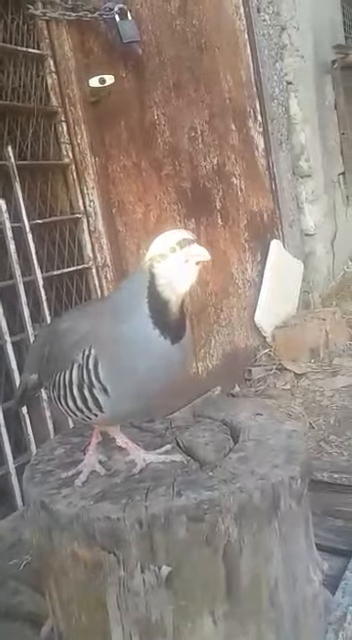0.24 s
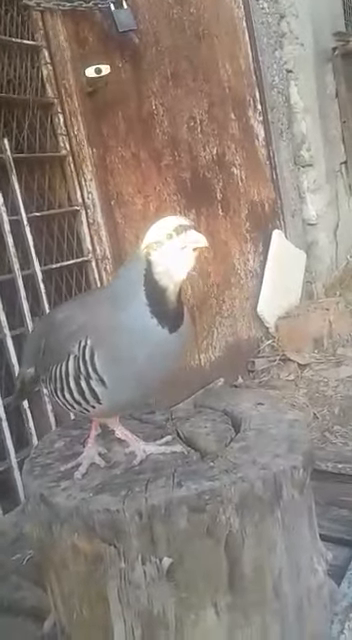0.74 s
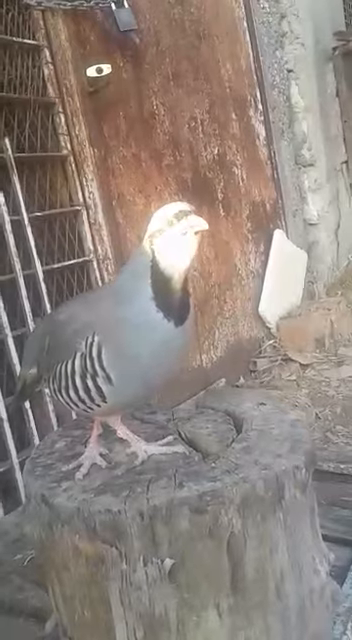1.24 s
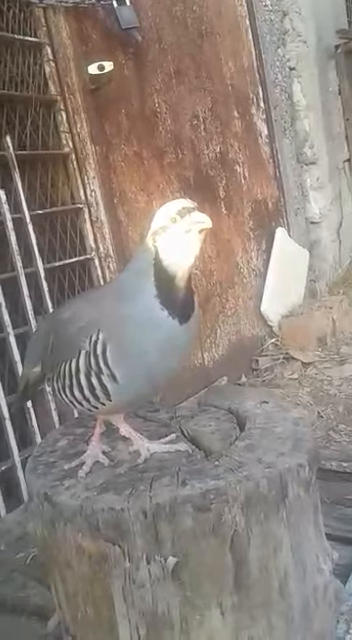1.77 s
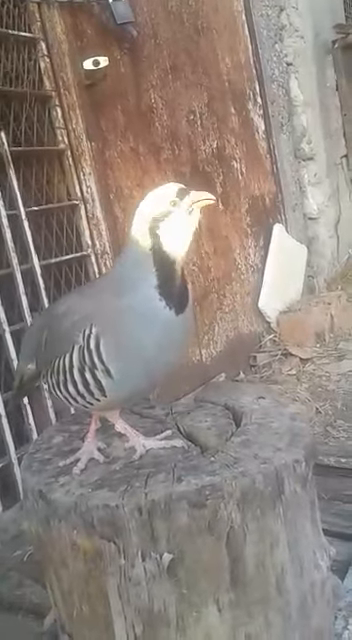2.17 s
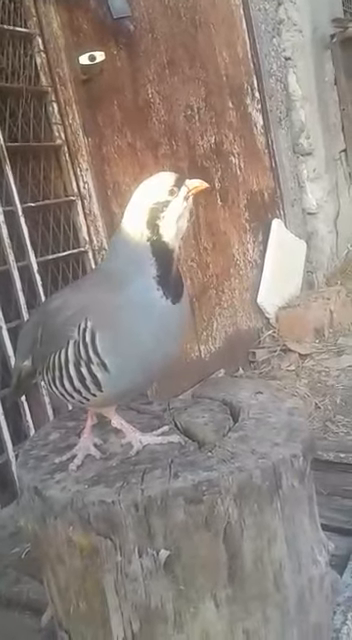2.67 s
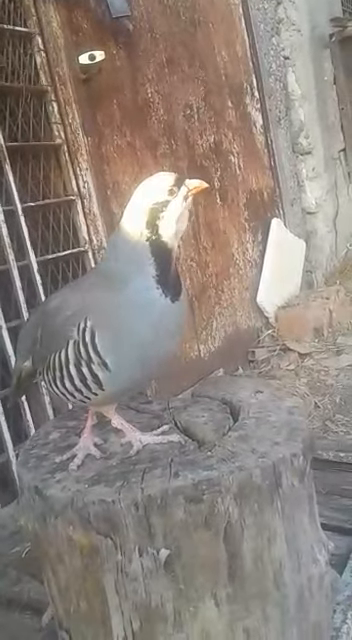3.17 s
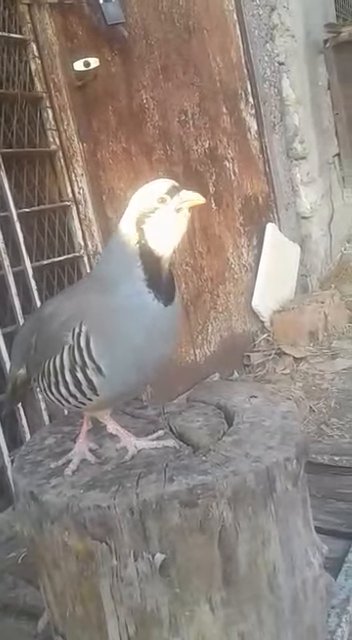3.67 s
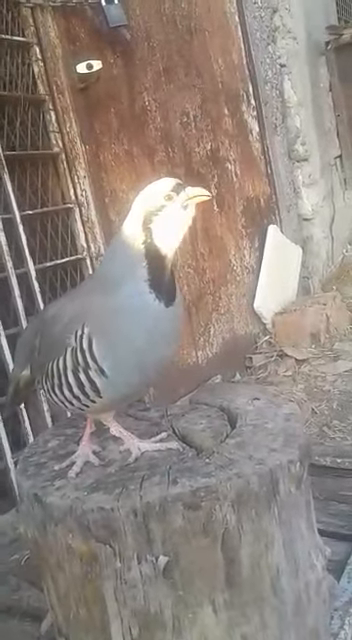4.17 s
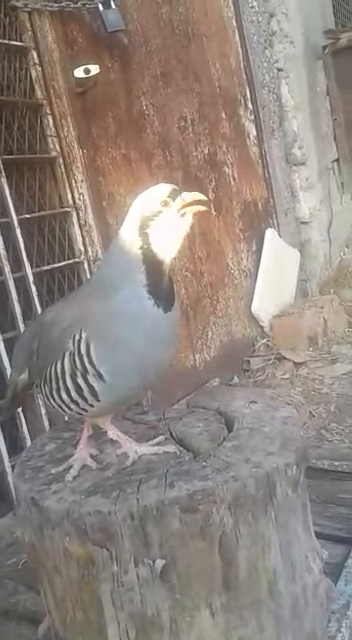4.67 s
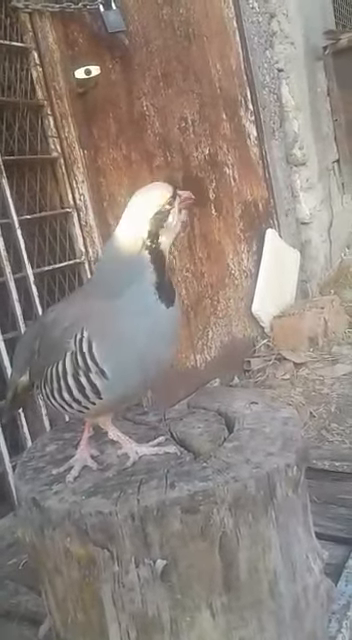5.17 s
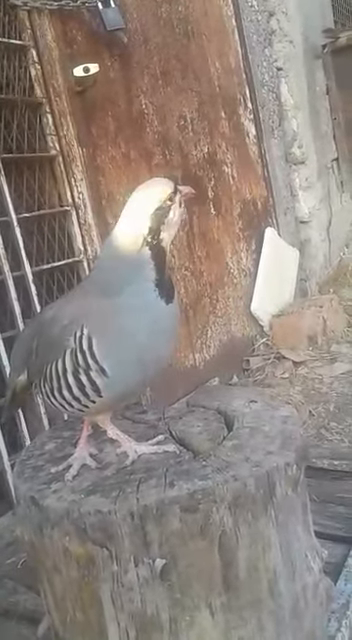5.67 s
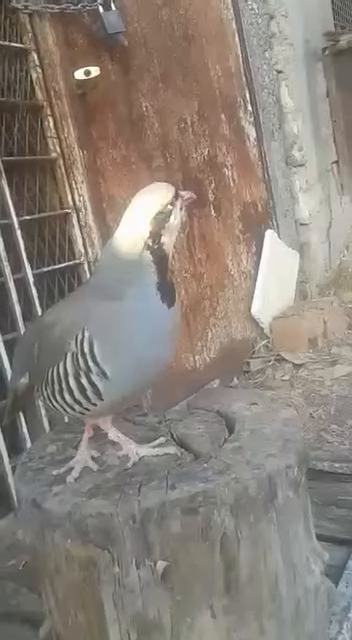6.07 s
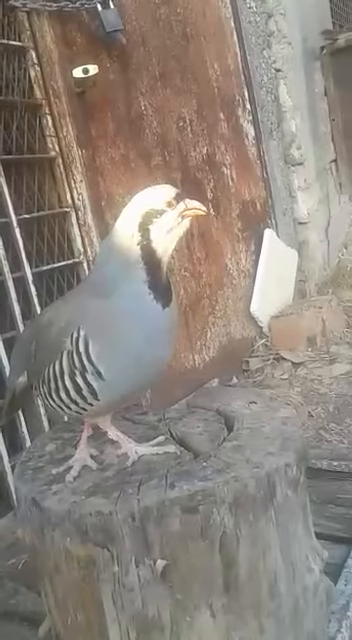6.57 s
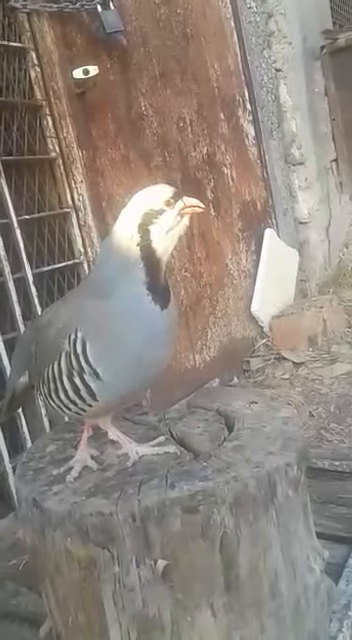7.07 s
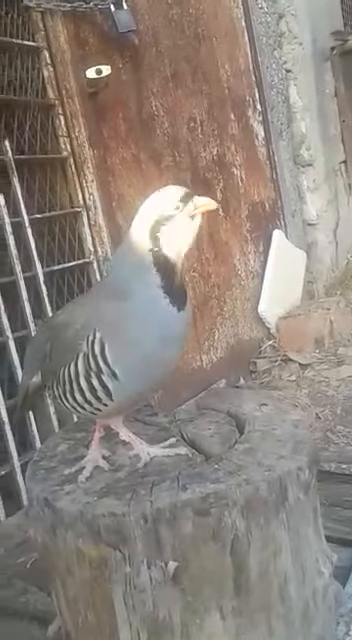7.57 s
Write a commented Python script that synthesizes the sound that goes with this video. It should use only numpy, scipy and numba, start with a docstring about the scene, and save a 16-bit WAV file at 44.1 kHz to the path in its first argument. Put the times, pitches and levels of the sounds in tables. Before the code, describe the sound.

A partridge calls close to the microphone in a small walled yard, over a steady low outdoor rumble. It opens with a soft cluck and a warbling cackle, then from about 0.6 seconds repeats quick phrases of harsh bark, cluck and cackle. Between 2.1 and 2.6 seconds it breaks into four loud, clear chucks, then returns to the phrases. Two more chucks come around 4.7 seconds and four between 6.6 and 7.2 seconds, followed by a last bark, cluck and cackle ending near 7.7 seconds. A second partridge gives faint, hoarse notes further off until about 3.8 seconds. A small distant bird chirps thinly now and then, mostly after 5.5 seconds. Feathers rustle softly at 3.4 seconds, and one dry tick sounds right at the microphone at 7 seconds. The walls ring briefly after each note.

```python
"""A small walled yard, a low outdoor rumble; a chukar partridge on a stump, close to the microphone.
It opens with a soft cluck while a small bird and a second partridge call faintly further off.
A warbling cackle follows, then phrases of harsh bark, cluck and cackle, all pulses of the syrinx
ringing in throat and beak. From 2 s on it breaks three times into loud, clear chucks. Feathers rustle
at 3.4 s, and one dry tick comes at 7 s. The walls ring briefly after each note."""
import sys
import numpy as np
from scipy import signal
from scipy.fft import rfft, irfft
from scipy.io import wavfile
from scipy.ndimage import uniform_filter1d
from numba import njit

SR = 44100
rng = np.random.default_rng(int(sys.argv[2]) if len(sys.argv) > 2 else 0)


def generate_wav(sig):
    """Save sig (samples, or channels by samples) to the path in sys.argv[1] as 16-bit PCM at SR."""
    pcm = np.round(np.clip(np.atleast_2d(sig).T, -1, 1) * 32767).astype(np.int16)
    wavfile.write(sys.argv[1], SR, pcm)


N = 345303


def from_db(db):
    """Decibels to gain."""
    return 10 ** (np.asarray(db) / 20)


def add(out, start_s, sound):
    """Mix a sound in at its time."""
    at = max(int(start_s * SR), 0)
    out[at:at + len(sound)] += sound[:max(len(out) - at, 0)]


def noise(*shape):
    """White noise for one note, up to a quarter second long."""
    return rng.standard_normal((*shape[:-1], SR // 4))[..., :shape[-1]]


def smooth(x, seconds):
    """Moving average."""
    return uniform_filter1d(x, max(int(seconds * SR), 1))


def even(x):
    """Hold the rms at 1 over a few voice cycles."""
    return x / np.sqrt(np.abs(smooth(smooth(x * x, .007), .007)) + 1e-12)


def response(points, size=1024):
    """Causal (minimum-phase) impulse response for points (frequency [Hz], level [dB])."""
    hz, db = np.transpose(points)
    grid = np.maximum(np.arange(size // 2 + 1) * SR / size, 1)
    gain = from_db(np.interp(np.log(grid), np.log(hz), db))
    cepstrum = irfft(np.log(gain))
    cepstrum[1:size // 2] *= 2
    cepstrum[size // 2 + 1:] = 0
    return irfft(np.exp(rfft(cepstrum)))


def through(x, impulse):
    """Filter by an impulse response."""
    return signal.fftconvolve(x, impulse)[:len(x)]


@njit
def moving_resonance(x, centre, width):
    """One resonance whose centre glides; centre and width in cycles per sample."""
    out, state = np.zeros(len(x)), 0j
    for i in range(len(x)):
        state = state * np.exp(-np.pi * width + 2j * np.pi * centre[i]) + x[i]
        out[i] = state.real
    return out


def air(level_db=-47):
    """Steady outdoor rumble and hush all round the microphone."""
    # colour of the background: (frequency [Hz], relative level [dB])
    spectrum = [(25, -23), (45, -7), (65, 0.5), (88, 0.5), (112, -2), (160, -4), (230, -7.5), (500, -9.5),
                (1700, -8), (2150, -24.5), (3500, -34), (4300, -33), (5000, -35.5), (7300, -48),
                (8400, -60.5), (12000, -45.5), (16000, -40.5)]
    rumble = through(rng.standard_normal(N + SR), response(spectrum, size=8192))[SR:]
    return from_db(level_db) * rumble / rumble.std()


def hum(hz=89, width_hz=10, level_db=-63.5):
    """A faint wavering drone in the distance: noise in one narrow resonance."""
    drone = moving_resonance(rng.standard_normal(N + SR), np.full(N + SR, hz / SR), width_hz / SR)[SR:]
    lowpass = signal.butter(2, 200, fs=SR, output="sos")
    return from_db(level_db) * signal.sosfilt(lowpass, drone / drone.std())


def syrinx(pitch, rough, hiss=0.038, stumble=0.16, shimmer_db=3.5, doubling_db=-1.5):
    """One pulse a cycle; with roughness the pulses stumble, alternate strong and weak, and carry hiss."""
    cycles = np.cumsum(pitch) / SR
    turn, samples = np.arange(int(cycles[-1]) + 1), np.arange(len(pitch))
    unrest = np.interp(turn, cycles, rough)
    slip, size = noise(2, len(turn))
    when = np.interp(turn + stumble * unrest ** 2 * slip, cycles, samples)   # steady until it breaks
    strength = from_db(unrest * (shimmer_db * size + doubling_db * (-1) ** turn))
    pulses = strength @ np.sinc(np.clip(samples - when[:, None], -8, 8))
    breath = hiss * rough * (1 + np.cos(2 * np.pi * cycles)) * noise(len(pitch))
    return pulses + breath


def voice(pitch, level_db, throat_hz, rough, beak, bright_db, width_hz, chest_db):
    """Pulses ring in chest, throat and beak; an opening beak raises the throat resonance and treble."""
    # the throat's steady colour, under its moving resonance: (frequency [Hz], level [dB])
    throat = [(150, -22), (260, 8), (350, 6), (470, 1), (600, -6), (780, 1.5), (1000, -1), (1330, -1),
              (1580, -10), (2000, -13), (2800, -24), (5000, -44)]
    chest_hz, body_db, beak_db, beak_db_per_octave = 380, 0.25, -25.5, 10.5
    source = syrinx(pitch, np.clip(rough, 0, 1))
    body = through(source, response(throat))
    for _ in range(2):   # two passes give the resonance steep flanks
        body = moving_resonance(body, throat_hz / SR, width_hz / SR)
    chest = signal.lfilter(*signal.iirpeak(chest_hz, 2, fs=SR), body)
    body = body + (from_db(chest_db) - 1) * chest
    edge = through(source, response(beak))
    edge_db = beak_db + bright_db + beak_db_per_octave * np.log2(throat_hz / 1000)
    edge_db += 0.42 * (level_db - np.median(level_db))   # weak moments of a note are duller
    return from_db(level_db) * (from_db(body_db) * even(body) + from_db(edge_db) * even(edge))


def course(rows, glide_s=0.0037, catch_s=0.0032, release_s=0.0025):
    """Rows (time [s], pitch [Hz], level [dB], ...) as smooth controls; the voice catches and lets go."""
    times, pitch, db, *others = np.transpose(rows)
    times = np.sort(times)
    t = np.arange(times[0], times[-1] + .002, 1 / SR)
    columns = (pitch, from_db(db) ** 2, *others)
    pitch, power, *others = [smooth(np.interp(t, times, column), glide_s) for column in columns]
    catch = (1 + np.tanh(2 * (t - times[0] - catch_s) / catch_s)) / 2
    gate = catch * np.tanh((t[-1] - t) / release_s)
    return pitch, 10 * np.log10(np.abs(power) * gate ** 2 + 1e-14), *others


def chatter(times, pitch, db, throat_hz, break_hz=410, break_span_hz=220):
    """The low voice of clucks and cackles; it turns rough on high crests and in fast swings."""
    # resonances of the half-open beak: (frequency [Hz], level [dB])
    half_open_beak = [(1500, -13), (1950, -1), (2400, 2), (2700, -13.5), (3100, -17), (3580, 1),
                      (3850, -5.5), (4200, -0.5), (4550, 4), (4800, -4.5), (5100, -19), (5600, -31),
                      (6450, -28.5), (6900, -22), (7450, -32), (8200, -47.5), (9800, -44), (11500, -29.5),
                      (15500, -33)]
    pitch, db, throat_hz = course(np.column_stack([times, pitch, db, throat_hz]))
    octaves_per_s = smooth(np.abs(np.gradient(np.log2(pitch))) * SR, .02)
    rough = 0.2 + np.maximum(pitch - break_hz, 0) / break_span_hz + 0.0067 * octaves_per_s
    return voice(pitch, db, throat_hz, rough, half_open_beak, bright_db=3.0, width_hz=500, chest_db=4.0)


def clucks(attack_s=0.0089, attack_db=12, fade_db=13):
    """The near bird's soft clucks: one quick bend of pitch, loudest just after it starts."""
    # (time [s], length [s], first, middle and last pitch [Hz], level [dB], throat resonance [Hz])
    notes = [(0.066, 0.038, 407, 402, 390, -16.5, 886), (0.417, .046, 264.3, 311, 242, -20, 910),
             (0.724, 0.0419, 321, 306, 246, -23.5, 820), (1.255, 0.045, 308, 349, 246, -23.5, 880),
             (1.778, 0.041, 420, 351.6, 239, -18, 870), (2.865, 0.038, 329, 316, 239, -24.5, 840),
             (3.409, 0.04, 386, 333, 446, -22, 860), (3.954, 0.038, 438, 550.5, 378, -17.5, 940),
             (4.358, 0.057, 485, 485, 250, -12, 1150), (4.468, 0.03, 304, 343, 263.2, -15.5, 1100),
             (5.096, 0.0489, 325, 345, 250, -24, 850), (5.655, 0.038, 464, 425, 387, -19, 860),
             (6.198, 0.036, 427, 523, 364, -17.5, 900), (7.434, 0.047, 342, 318, 245, -26.5, 818)]
    out = np.zeros(N)
    for start, length, first_hz, middle_hz, last_hz, db, throat_hz in notes:
        u = np.linspace(0, 1, int(length * SR))
        outer_hz = np.where(u < .5, first_hz, last_hz)
        pitch = middle_hz + (outer_hz - middle_hz) * np.cos(np.pi * u) ** 2
        level_db = db - attack_db * np.maximum(1 - u * length / attack_s, 0) - fade_db * u ** 3.2
        add(out, start, chatter(start + u * length, pitch, level_db, np.full(len(u), throat_hz)))
    return out


def small_bird(octave_db=-21, waver_hz=70):
    """Far off, gliding, slightly wavering whistles with a weak octave."""
    # thin chirps and fainter, higher twitters: (time [s], length [s], first, last pitch [Hz], level [dB])
    chirps = [(5.66, 0.089, 2370, 2770, -49), (6.116, 0.096, 2714, 2873, -49.5),
              (6.215, 0.061, 2879, 2590, -57), (6.76, 0.04, 1850, 2168, -43),
              (7.34, 0.044, 2580, 2410, -41), (7.768, 0.034, 2218, 1980, -44.5)]
    twitters = [(0.128, .07, 5260, 5900, -70.5), (1.52, .07, 5500, 6100, -67),
                (3.718, 0.068, 5670, 6130, -60), (5.67, 0.068, 4900, 5600, -74),
                (6.127, 0.062, 5330, 5685, -68), (6.498, 0.13, 4200, 4310, -57)]
    out = np.zeros(N)
    for start, length, first_hz, last_hz, db in chirps + twitters:
        waver = smooth(noise(int(length * SR)), .002)
        pitch = np.linspace(first_hz, last_hz, len(waver)) + waver_hz * waver / waver.std()
        phase = 2 * np.pi * np.cumsum(pitch) / SR
        whistle = np.sin(phase) + from_db(octave_db) * np.sin(2 * phase)
        add(out, start, from_db(db) * np.hanning(len(phase)) * whistle)
    return out


def far_partridge(gain_db=-7.5, width_hz=340, rough=0.72, fall=.16):
    """Hoarse falling notes whose third harmonic sits on the throat resonance, dulled by distance."""
    # the second bird's calls: (time [s], length [s], level [dB], throat resonance [Hz])
    calls = [(0.148, 0.063, -30.5, 1510), (0.396, 0.071, -27, 1650), (.98, 0.029, -22, 1660),
             (1.295, 0.046, -28.5, 1680), (1.515, 0.044, -24.5, 1677), (1.553, 0.044, -25.5, 1544),
             (1.706, 0.036, -35.5, 1920), (2.094, 0.0326, -23.5, 1784), (2.469, 0.038, -39.5, 1716),
             (2.682, 0.019, -29.5, 1805), (2.71, 0.042, -26.5, 1797), (3.401, 0.045, -30, 1708),
             (3.452, 0.055, -26, 1323), (3.605, 0.054, -36, 1810), (3.727, .03, -26, 1205),
             (3.755, 0.042, -32.5, 1470)]
    out = np.zeros(N)
    band = signal.butter(4, [1150, 1900], "band", fs=SR, output="sos")
    for start, length, db, throat_hz in calls:
        u = np.linspace(0, 1, int(length * SR))
        centre_hz = throat_hz * (1 + fall * (.5 - u))
        source = signal.sosfilt(band, syrinx(centre_hz / 3, np.full(len(u), rough)))
        call = moving_resonance(source, centre_hz / SR, width_hz / SR)
        arch = np.sqrt(np.abs(np.sin(np.pi * u)))
        add(out, start, from_db(db + gain_db) * even(call) * arch)
    return out


def cackles():
    """The near bird's pitch warbles some thirty times a second up to a closing crest, then falls away."""
    # (time [s], length [s], warble period [s], trough pitch [Hz], early, late and closing crest [Hz],
    #  opening and closing level [dB], closing throat resonance [Hz], falter after the start [s])
    runs = [(.256, 0.081, 0.028, 325.3, 414, 440, 465, -26.5, -29.5, 870, 0.061),
            (.332, .090, .030, 322.7, 510, 512, 478.6, -16.5, -23, 975, 0.0056),
            (0.795, .069, .030, 392, 477.5, 483, 469, -23, -21.5, 936, 0.0012),
            (0.877, .099, .032, 329.3, 470, 473, 475.7, -20, -17, 1076, 0.00075),
            (1.335, 0.15, 0.036, 320, 486, 449, 467, -21, -17.5, 1050, 0.084),
            (1.857, 0.085, 0.029, 367.5, 525, 527, 487.5, -17.5, -17.5, 1060, 0.0021),
            (2.941, .211, 0.03334, 312.6, 480, 336, 382.5, -23.5, -19.5, 1000, 0.061),
            (3.495, 0.19, 0.032, 332, 495, 508.6, 483, -21.5, -17.5, 1070, 0.091),
            (4.04, 0.15, 0.031, 347.3, 503.6, 489.4, 455, -20.5, -16.5, 1062, 0.064),
            (5.184, 0.21, .030, 342.6, 466.4, 447, 415.6, -21, -16, 1080, .060),
            (5.739, 0.165, 0.0306, 333.2, 490.6, 471, 465, -22.5, -18.5, 1035, 0.079),
            (6.265, 0.16, 0.03275, 339.3, 461, 482.5, 517.5, -24.5, -19, 1066, 0.077),
            (7.513, 0.2253, 0.0362, 332.8, 456.7, 391, 412, -22.5, -17.5, 1044, 0.086)]
    attack_s, attack_db, opening_throat_hz = 0.012, 14, 890
    throb_db, throb_lag_s = 1.5, 0.0096   # loudest just after each crest
    falter_db, falter_s = 9, .009   # once in each run the voice nearly stops
    push_db, push_hz, push_s = 2, 25, 0.02   # the closing crest is pressed out louder, the beak wider
    fall_s, last_hz, fade_db = 0.041, 245.9, 13
    out = np.zeros(N)
    for (start, length, period, trough_hz, early_hz, late_hz, closing_hz,
         opening_db, closing_db, closing_throat_hz, falter_at) in runs:
        t = np.arange(int(length * SR)) / SR
        peak_s = length - fall_s
        progress, fall = np.minimum(t / peak_s, 1), np.maximum(t - peak_s, 0) / fall_s
        crest_hz = np.interp(progress, [.42, .68, 1], [early_hz, late_hz, closing_hz])
        crest_times = np.arange(peak_s, -period, -period)[::-1]
        heights = 1 + .1 * noise(len(crest_times)) * (crest_times < peak_s)
        warble = np.abs(np.cos(np.pi * (t - peak_s) / period)) ** 2.8 * np.interp(t, crest_times, heights)
        warbling_hz = trough_hz + (crest_hz - trough_hz) * warble
        falling_hz = closing_hz + (last_hz - closing_hz) * fall ** 1.3
        pitch = np.where(t < peak_s, warbling_hz, falling_hz)
        swell = progress ** 2.2
        push = np.exp(-((t - peak_s) / push_s) ** 2)
        db = opening_db + (closing_db - opening_db) * swell + push_db * push - fade_db * fall ** 4.1
        db += throb_db * np.cos(2 * np.pi * (t - peak_s - throb_lag_s) / period)
        db -= attack_db * np.maximum(1 - t / attack_s, 0)
        db -= falter_db * np.exp(-((t - falter_at) / falter_s) ** 2)
        throat_hz = opening_throat_hz + (closing_throat_hz - opening_throat_hz) * swell + push_hz * push
        add(out, start, chatter(start + t, pitch, db, throat_hz))
    return out


def shaped_note(shape, length, hz, db, bright_db, width_hz, chest_db):
    """One bark or chuck: it runs the course of its kind at its own length, pitch and strength."""
    # upper resonances of windpipe and beak: (frequency [Hz], level [dB])
    beak = [(1500, -24.5), (2000, -12.5), (2450, -2.5), (2650, -10.5), (2820, -15), (3100, -21.5),
            (3570, -8.5), (3780, -7.5), (4050, 2), (4250, -2.5), (4520, 5.5), (4800, -8), (5080, -19),
            (5300, -16.5), (5600, -34.5), (6450, -29.5), (6900, -20), (7450, -33), (8200, -47.5),
            (9800, -45), (11500, -31), (15500, -36)]
    rows = [(share * length, ratio * hz, db + rise_db, throat_hz, rough)
            for share, ratio, rise_db, throat_hz, rough in shape]
    return voice(*course(rows), beak, bright_db, width_hz, chest_db)


def barks(hz=456, gain_db=-0.42):
    """The near bird's harsh notes, which shoot up in pitch and break."""
    # (time [s], length [s], level [dB], brightness [dB])
    notes = [(.595, 0.05, -20, -3), (1.129, 0.048, -18.5, -1), (1.65, 0.047, -17, -2.5),
             (2.744, 0.051, -21, -8.5), (3.282, 0.05, -18.5, -7), (3.833, .0505, -17, -3),
             (4.974, .053, -18.5, -5.5), (5.529, 0.054, -17.5, -4.5), (6.078, 0.05, -18, -4),
             (7.312, .049, -20.5, -7.5)]
    # course of a bark: (share of length, pitch ratio, level [dB], throat resonance [Hz], roughness [0-1])
    shape = [(0, .93, -24, 887.3, .05), (.1, 1.0, -6.5, 916.7, .05), (.22, 1.12, 1.5, 983.3, .12),
             (0.361, 1.55, 1, 1050, 0.87), (.48, 0.9995, 3.5, 1067, 0.8132),
             (.66, 1.22, -0.5, 976.8, 0.7017), (.82, .96, -11, 906, 0.85), (.95, 1.4, -18.5, 940.6, 0.47),
             (1.08, 1.189, -30, 934.9, 0.64)]
    out = np.zeros(N)
    for start, length, db, bright_db in notes:
        bark = shaped_note(shape, length, hz, db + gain_db, bright_db + 8, width_hz=850, chest_db=-5.9)
        add(out, start, bark)
    return out


def chucks():
    """The near bird's loud, clear arched notes; the chest lifts their fundamental."""
    # (time [s], length [s], pitch [Hz], level [dB], brightness [dB])
    notes = [(2.105, 0.049, 402.6, -14, -2), (2.256, 0.048, 407, -13, -1.5), (2.413, 0.053, 400, -13.5, -5),
             (2.571, 0.061, 410.3, -13, -4), (4.643, 0.054, 414, -12.5, -2.5),
             (4.803, 0.054, 411.6, -13, -1.5), (6.615, 0.055, 409, -13.5, -6), (6.8, 0.054, 416, -13, -2.5),
             (6.964, 0.054, 413.6, -13.5, -1.2), (7.133, 0.058, 420.4, -12.5, -4)]
    # a chuck's course: (share of length, pitch ratio, level [dB], throat resonance [Hz], roughness [0-1])
    shape = [(0, 1.05, -32.5, 1251, 0.4), (0.082, .9, -12.5, 1240, 0.5), (0.18, .87, -5, 1323, 0.44),
             (.32, .96, -0.5, 1327, 0.47), (0.458, 1.005, 0.5, 1235, 0), (0.619, .985, 0.5, 1152, 0.11),
             (0.761, .89, -10, 1150, .08), (.9, .73, -5, 1155, 0.24), (1.02, .65, -10, 1090, 0),
             (1.12, .6, -29.5, 1056, 0.4)]
    out = np.zeros(N)
    for start, length, hz, db, bright_db in notes:
        add(out, start, shaped_note(shape, length, hz, db, bright_db + 4, width_hz=600, chest_db=4.5))
    return out


def rustle(start_s=3.438, length_s=0.091, level_db=-47.5):
    """A brief soft swish of feathers."""
    # colour of the feathers: (frequency [Hz], relative level [dB])
    spectrum = [(500, -15), (1500, 7), (2500, 5), (4000, 3), (5500, -6), (7500, -10), (9000, -38),
                (15000, -23)]
    out = np.zeros(N)
    swish = through(noise(int(length_s * SR)), response(spectrum))
    add(out, start_s, from_db(level_db) * np.hanning(len(swish)) * swish / swish.std())
    return out


def tick(start_s=7.0232, peak_db=-8.5):
    """A single dry click right at the microphone."""
    # colour of the click: (frequency [Hz], relative level [dB])
    spectrum = [(150, -9), (400, 4), (1200, -4), (2700, -2.5), (3600, -18), (4500, -37), (15000, -38)]
    out, click = np.zeros(N), response(spectrum)
    add(out, start_s, -from_db(peak_db) * click / np.abs(click).max())
    return out


def yard(x, tail_db=-15, tail_t60_s=0.19, build_up_s=0.0075, scatter_db=-6.0, scatter_t60_s=0.038):
    """What the yard sends back: a diffuse tail, scatter off stump and door, echoes, standing waves."""
    # colour of the tail: (frequency [Hz], level [dB])
    tail_spectrum = [(200, -1), (700, -7.5), (1200, 5), (1800, -2.5), (3000, -3.5), (4500, -1),
                     (8000, -1.5), (15000, -10)]
    # reflections off ground and walls: (delay [s], level [dB])
    echoes = [(.0047, -49.5), (.0099, -30), (0.0109, -24.5), (.025, -25.5)]
    # standing waves between the walls: (frequency [Hz], level [dB], time to fall 60 dB [s])
    modes = [(1010, -7, 0.24), (1149.1, -18.5, 0.6), (1207.8, -4.5, 0.25), (1374, -29, 0.26),
             (1420.1, -21.5, 0.31)]
    t = np.arange(SR // 2) / SR
    build_up = 1 - np.exp(-(t / build_up_s) ** 2)
    tail = rng.standard_normal(len(t)) * from_db(-60 * t / tail_t60_s) * build_up
    impulse = from_db(tail_db) * through(tail / np.linalg.norm(tail), response(tail_spectrum))
    scatter = rng.standard_normal(len(t)) * from_db(-60 * t / scatter_t60_s)
    treble = signal.butter(1, 1300, "high", fs=SR, output="sos")
    impulse += from_db(scatter_db) * signal.sosfilt(treble, scatter / np.linalg.norm(scatter))
    for delay_s, db in echoes:
        add(impulse, delay_s, from_db([db]))
    for hz, db, t60 in modes:
        decay = np.log(1000) / t60
        impulse += from_db(db) * 2 * decay / SR * np.exp(-decay * t) * np.cos(2 * np.pi * hz * t)
    return through(x, impulse)


def scene(near_db=-1.29, far_wet_db=8.0):
    """At one microphone: the near bird is mostly direct sound; distant ones carry more of the yard."""
    near = from_db(near_db) * (barks() + chucks() + cackles() + clucks())
    far = far_partridge() + small_bird()
    reflected = yard(near + from_db(far_wet_db) * far)
    return (near + far + reflected + tick() + rustle() + air() + hum())[None]


def record(dry):
    """The top is cut steeply."""
    cutoff_hz = 15900
    return signal.sosfilt(signal.ellip(10, .1, 80, cutoff_hz, fs=SR, output="sos"), dry)


dry = scene()
out = record(dry)
generate_wav(out)
```